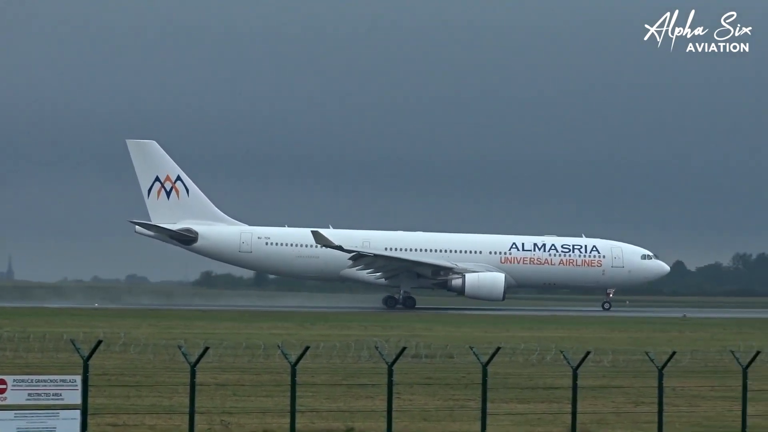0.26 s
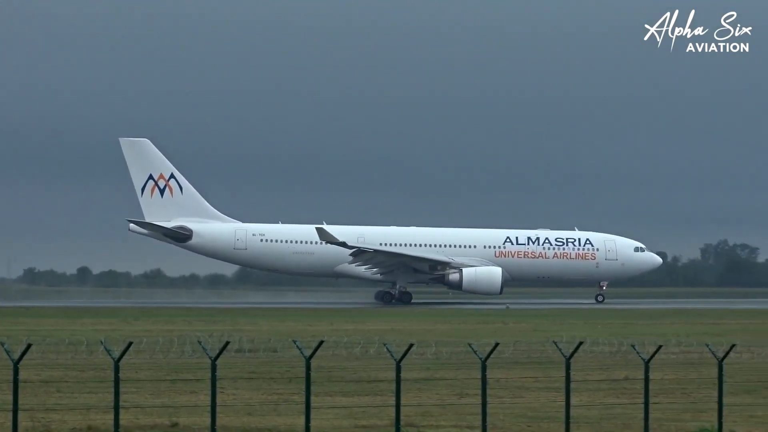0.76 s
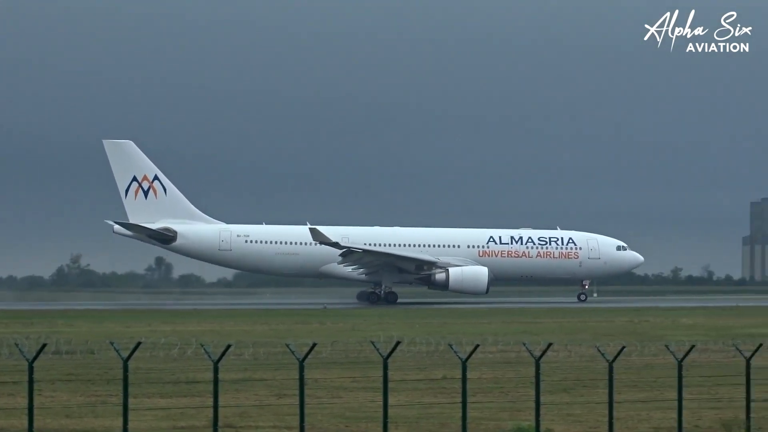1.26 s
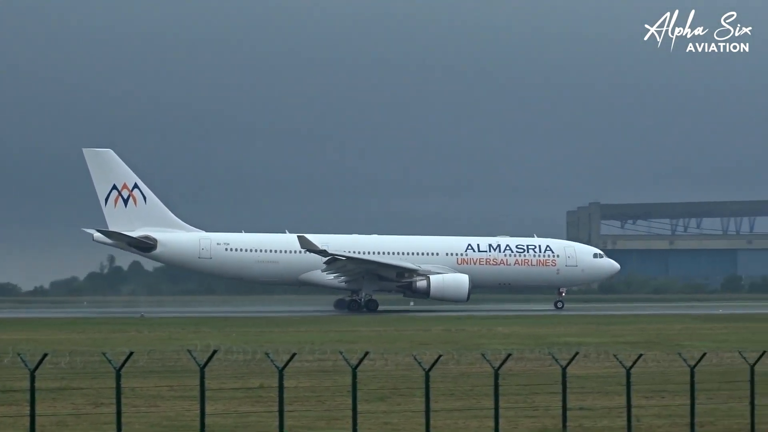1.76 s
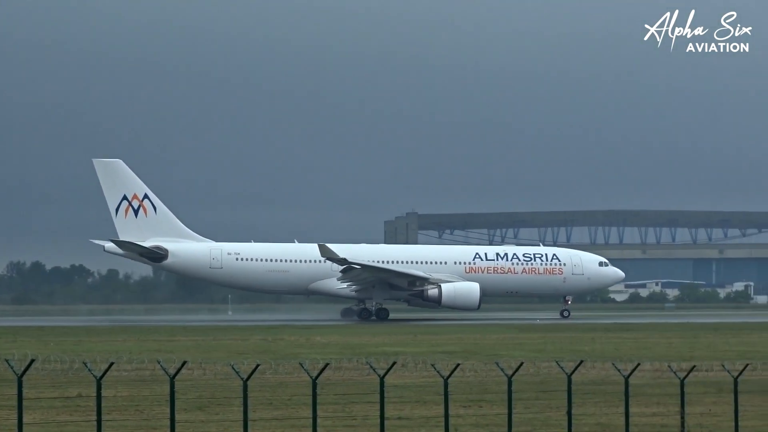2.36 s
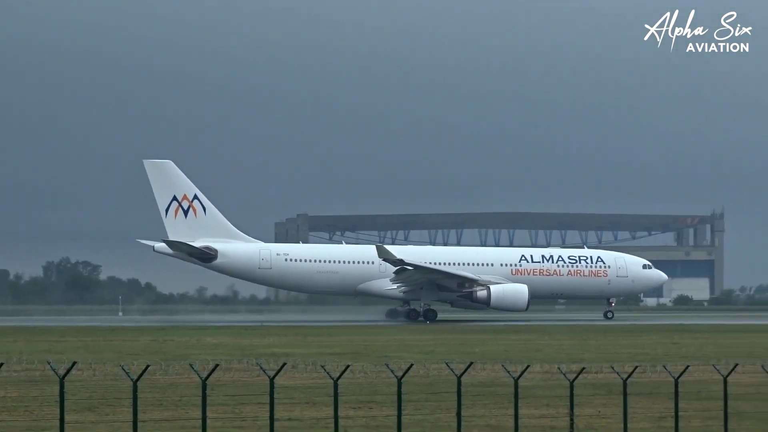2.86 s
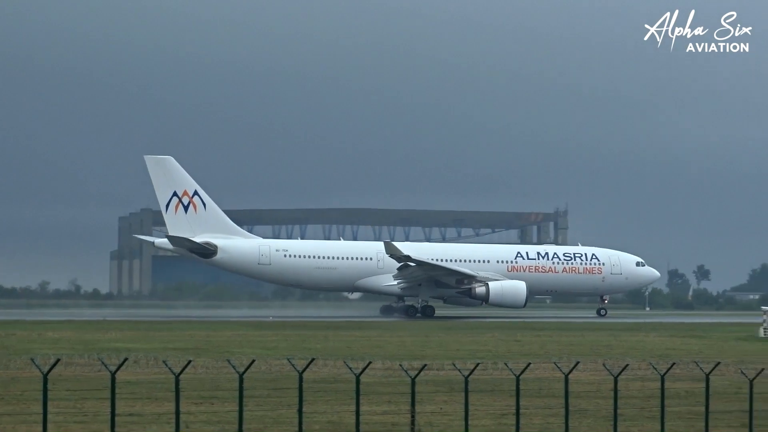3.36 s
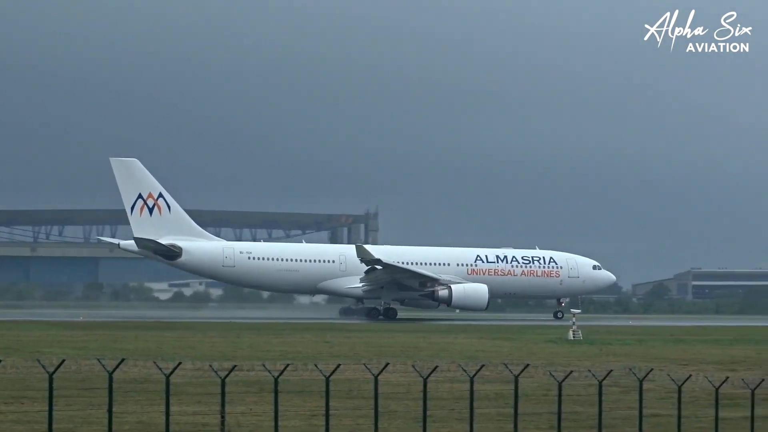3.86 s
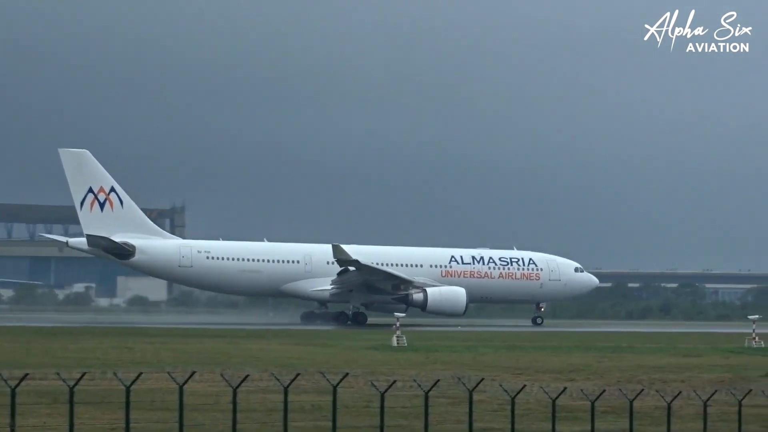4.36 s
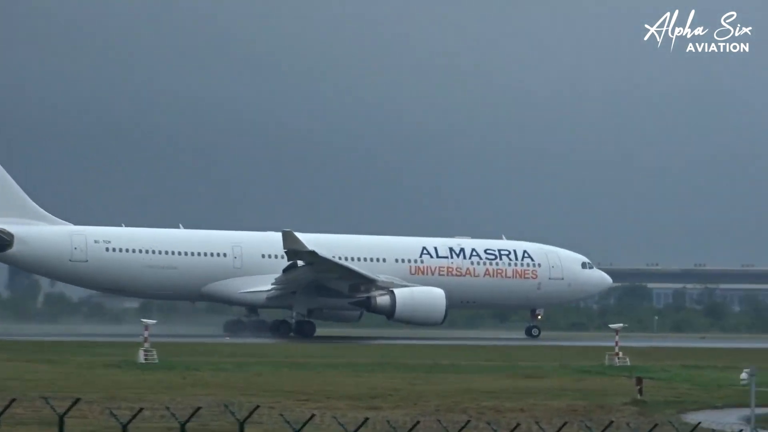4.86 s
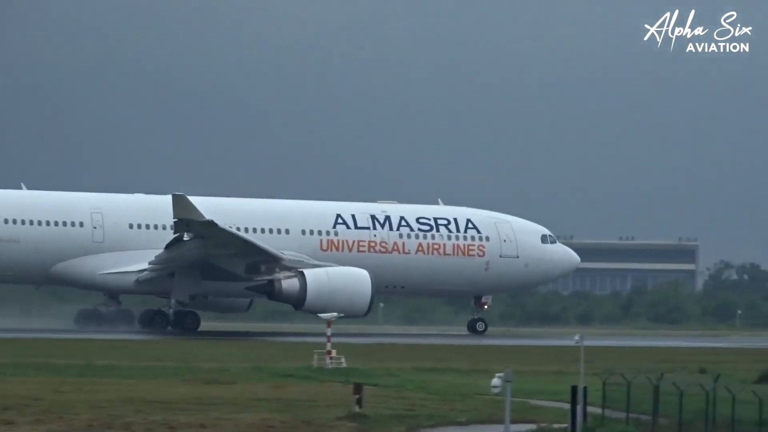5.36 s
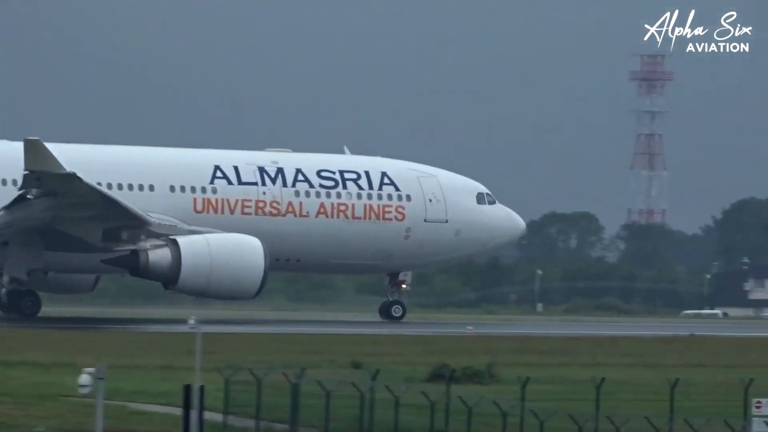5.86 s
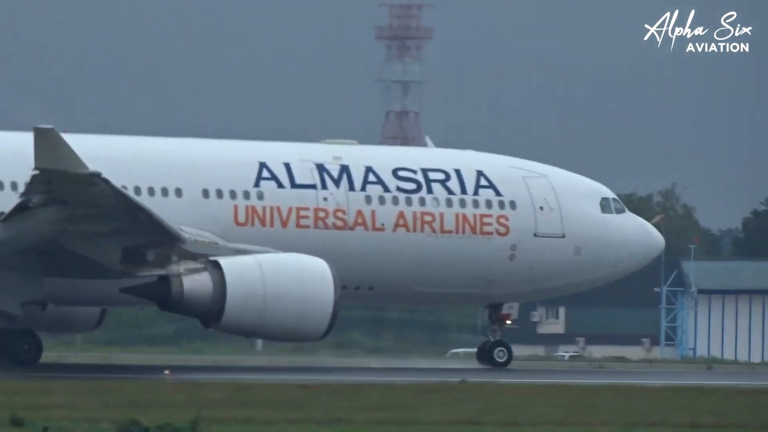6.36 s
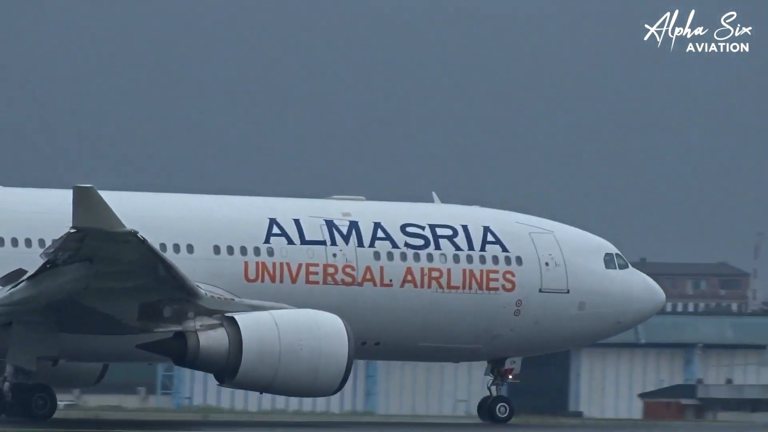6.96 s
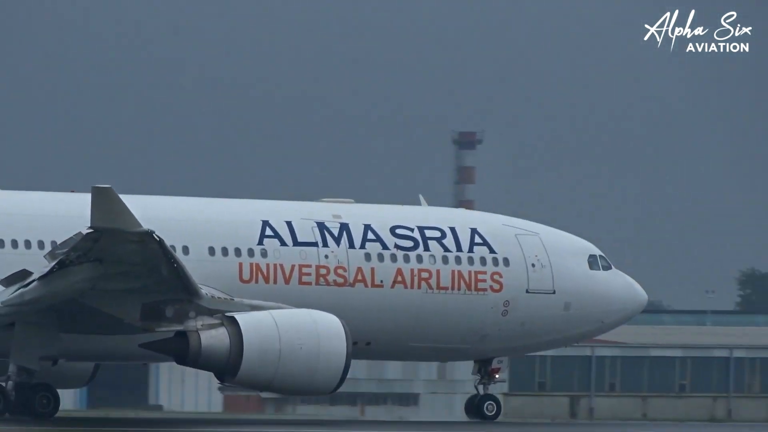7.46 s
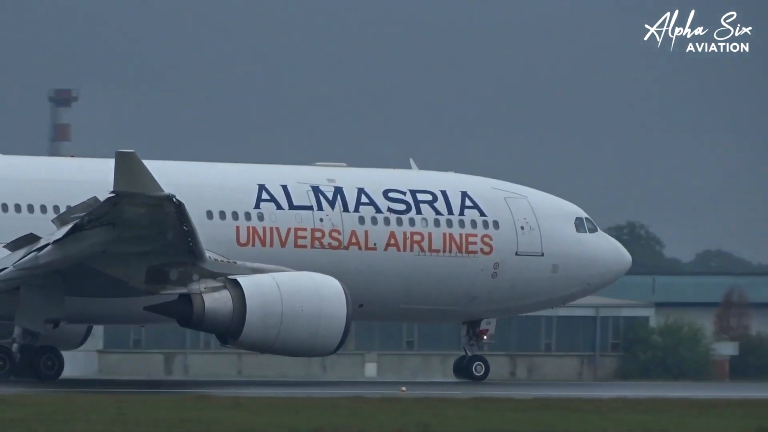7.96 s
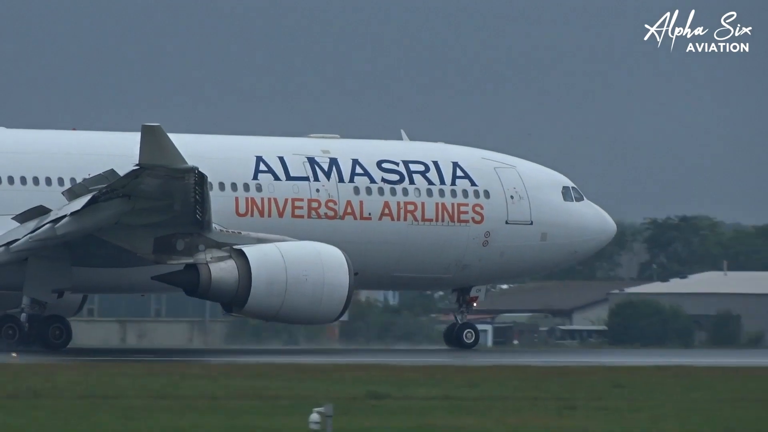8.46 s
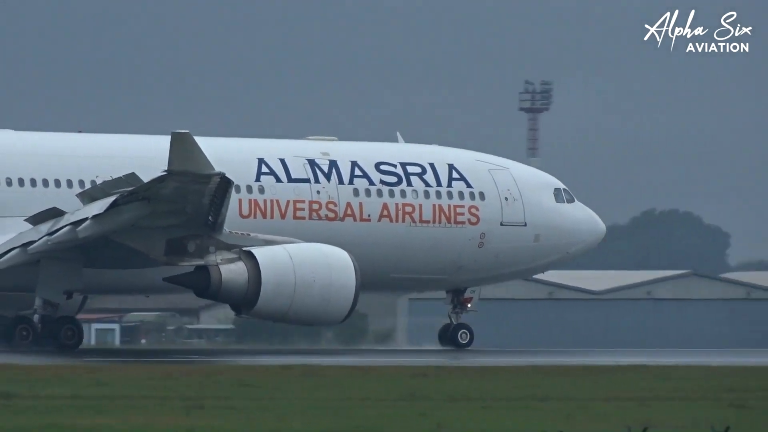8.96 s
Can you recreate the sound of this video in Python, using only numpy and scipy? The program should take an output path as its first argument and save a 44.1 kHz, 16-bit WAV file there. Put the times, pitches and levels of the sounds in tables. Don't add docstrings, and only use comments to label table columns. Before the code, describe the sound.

A twin-engine airliner slows along a wet runway, heard outdoors across a fence by a small stereo camera microphone. From 0 s a broad, hollow jet roar flutters and shifts in colour with the moving air. Two low howls near 365 Hz beat together; the nearer one is strong, peaks around 3 s and dies by 3.4 s, while the other returns in brief swells until about 6 s. Thin high whines flicker through, gliding down as the engines spool down. The roar dips near 4.3 and 7.3 s, swelling again toward the end at 9.2 s, drifting slightly left. Wind rumbles and buffets at the start, around 3.5 to 4.3 s and 6.6 to 8.5 s, with sharp snaps near 0.3, 4.2 and 7 s. A faint zoom-motor hiss runs from 4.2 to 6.4 s. Sparse raindrops tick on the housing, mostly after 6.3 s, over slight microphone hiss.

```python
import sys
import numpy as np
from scipy import signal
from scipy.fft import rfft, irfft, next_fast_len
from scipy.io import wavfile

SR = 44100
rng = np.random.default_rng(int(sys.argv[2]) if len(sys.argv) > 2 else 0)


def invert_db(level):
    return 10 ** (np.asarray(level, dtype=float) / 20)


def to_wav(sig):
    pcm = np.clip(np.atleast_2d(sig), -1, 1) * 32767
    pcm = np.round(pcm).astype(np.int16)
    wavfile.write(sys.argv[1], SR, pcm.T)


N = 406153


def rms_one(x):
    return x / np.sqrt(np.mean(x ** 2) + 1e-20)


def in_time(rows):
    s, *columns = np.transpose(rows)
    return [np.interp(np.arange(N) / SR, s, c) for c in columns]


def swells(rows, rise, fall, rest_db):
    t = np.arange(0, N + 64, 64) / SR
    power = 0
    for s, hold, db in rows:
        early, late = np.maximum(s - t, 0), np.maximum(t - s - hold, 0)
        power = power + invert_db(db - rise * early - fall * late) ** 2
    return 10 * np.log10(np.interp(np.arange(N) / SR, t, power) + invert_db(rest_db) ** 2)


def drift(rate):
    step = 16
    r = np.exp(-2 * np.pi * rate * step / SR)
    slow = signal.lfilter([1], [1, -2 * r, r * r], rng.standard_normal(N // step + 4002))[4000:]
    return np.interp(np.arange(N) / step, np.arange(len(slow)), rms_one(slow))


def at_hz(points, hz):
    f, db = np.transpose(points)
    return np.interp(np.log(hz), np.log(f), db)


def coloured(x, *spectra):
    size = next_fast_len(N)
    hz = np.maximum(np.arange(size // 2 + 1) * SR / size, 5)
    gain = invert_db(sum(at_hz(s, hz) for s in spectra))
    return irfft(rfft(x, size) * gain, size)[:N] * np.sqrt(SR / 2)


def filtered(x, hz, kind="low"):
    return signal.sosfilt(signal.butter(2, hz, kind, fs=SR, output="sos"), x)


def resonance(x, hz, width_hz):
    r = np.exp(-np.pi * width_hz / SR)
    top = np.array([1, 0, -1]) * (1 - r * r) / 2
    return signal.lfilter(top, [1, -2 * r * np.cos(2 * np.pi * hz / SR), r * r], x)


def stereo(mid, side):
    return np.array([mid + side, mid - side])


def panned(pan_db):
    return invert_db([pan_db / 2, -pan_db / 2])


# t/s, level/dB, brightness/dB
ROAR_LEVEL = [(0, -32, 1), (.6, -25, -1.5), (1.75, -28.5, -1), (1.97, -28.5, -2.5), (2.6, -28, -0.5),
              (3.05, -29, -1.5), (3.33, -26, 0), (4.27, -39, 4.5), (4.55, -29.5, 2), (4.9, -27, 1),
              (5.2, -30, -3.5), (5.8, -26.5, -2), (6.65, -27, -6), (7.3, -37.5, 3), (7.7, -30, 3.5),
              (8.25, -27, 1.5), (8.45, -33.5, -0.5), (9.0, -24.5, 1.5)]
ROAR_BANDS = [150, 700, 1700, 4500]
ROAR_FOLLOWS_LEVEL = [0.16, 0.81, 0.63, 0.23]
ROAR_FOLLOWS_BRIGHTNESS = [0.0, 0.0, .5, 1.0]
# f/Hz, level/dB per Hz
JET_COLOUR = [(25, -2), (80, -7), (300, 1.5), (500, 0), (900, -3), (1500, -3), (2300, -1.5), (2650, -6.5),
              (3400, -10), (4400, -1.5), (5500, -7), (7300, -14.5), (7900, -20), (9000, -27),
              (11000, -44.5)]
# f/Hz, side minus mid level/dB
JET_SPREAD = [(100, -24.5), (400, -44), (800, -20), (1700, -15.5), (3000, -10), (4000, -11.5),
              (4600, -28.5), (10000, -14)]
# start t/s, hold t/s, lift level/dB
CLEAR_MOMENTS = [
    (3.15, 0.11, 0.5),
    (4.85, 0.031, 2.5),
    (5.25, 0.14, 4),
    (5.72, 0.089, 4),
    (6.6, 0.054, 6.5),
    (7.75, 0.25, -19),
    (8.72, 0.045, 2),
]


def roar():
    loud_db, bright_db = in_time(ROAR_LEVEL)
    bright_db = bright_db + swells(CLEAR_MOMENTS, rise=25, fall=37, rest_db=0)
    mean_db = -30
    levels = (np.outer(ROAR_FOLLOWS_LEVEL, loud_db - mean_db)
              + np.outer(ROAR_FOLLOWS_BRIGHTNESS, bright_db)
              + [[-69.0], [-57.5], [-66.0], [-79.0]])
    noise = []
    for mid, side in rng.standard_normal((2, 2, N)):
        noise.append([coloured(mid, JET_COLOUR), coloured(side, JET_COLOUR, JET_SPREAD)])
    edges = 22 * 2 ** np.arange(0, 9.6, .5)
    out, shared = 0, drift(0.59)
    for k, (low, high) in enumerate(zip(edges, edges[1:])):
        place = np.interp(np.log(low * high) / 2, np.log(ROAR_BANDS), np.arange(4))
        level_db = np.maximum(1 - abs(place - np.arange(4)), 0) @ levels
        patchy_db = 0.7 * (drift(1.18) + 0.6 * shared)
        flutter_db = 1.22 * drift(15.6)
        band = filtered(noise[k % 2], [low, high], "band")
        out = out + band * invert_db(level_db + patchy_db + flutter_db)
    return band_swelled(np.array([echoed(x) for x in out]))


# t/s, hard echo delay/ms, its share [0-1], share of inverted ground echo [0-1]
NEAR_SURFACES = [(0, 1.97, 0.2, 0.07), (.6, 1.38, 0.25, 0.14), (1.6, 1.05, 0.21, 0.02),
                 (2.3, 0.94, 0, 0.09), (3.4, 1.34, 0.08, 0), (4.0, 1.3, 0, 0.23), (4.55, 0.83, 0.27, 0.36),
                 (5.1, 1.23, 0.28, 0.04), (5.6, 1.31, 0.35, 0.08), (6.0, 1.22, 0.2, 0.13),
                 (6.5, 1.38, 0.29, 0.01), (7.2, 1.37, 0.24, 0.07), (7.7, 1.4, 0.43, .01),
                 (8.4, 1.33, 0.27, .01), (8.8, 1.38, 0.29, 0), (9.21, 1.25, 0.4, .01)]


def echoed(x):
    cut_hz, rail_ms, rail_from_hz, rail_share, again = 1900, 1.335, 1800, 0.16, .9
    delay_ms, share, ground = in_time(NEAR_SURFACES)
    ground_ms = 1.49 + .035 * np.arange(N) / SR
    dull = filtered(x, cut_hz)
    lead = np.sqrt(2) / (2 * np.pi * cut_hz) * SR
    once, twice, thrice, below = [np.interp(np.arange(N) + lead - ms * SR / 1000, np.arange(N), dull)
                                  for ms in (delay_ms, 2 * delay_ms, 3 * delay_ms, ground_ms)]
    bounces = share * once + again * share ** 2 * (twice + share * thrice)
    rail_band = signal.butter(2, [rail_from_hz, 2 * rail_from_hz], "band", fs=SR, output="sos")
    rail = rail_share * np.roll(signal.sosfiltfilt(rail_band, x), round(rail_ms * SR / 1000))
    return (x + rail + bounces - ground * below) / np.sqrt(1 + share ** 2 + ground ** 2)


# t/s, length/s, f/Hz, lift level/dB
BAND_SWELLS = [(0.106, .2, 1500, 2.5), (.6, 0.22, 1620, 4.5), (.65, .2, 1050, 5.5), (1.15, 0.12, 900, 5.5),
               (1.2, 0.41, 620, 2.5), (1.302, 0.63, 6770, -1), (1.7, 0.45, 3330, 1.5),
               (1.657, 0.14, 980, 7.5), (2.402, .4, 3000, 1.5), (2.6, 0.41, 720, 6), (3.1, 0.39, 1450, -6),
               (3.402, .2, 750, 6), (3.7, 0.28, 520, -8), (4.0, 0.42, 1580, -14), (4.0, 0.46, 2200, 1.5),
               (4.75, 0.23, 856, 3.5), (4.752, 0.24, 2180, 5.5), (4.75, 0.27, 3000, 4.5),
               (5.585, 0.15, 1660, 7.5), (5.792, 0.65, 745, 5.5), (6.1, 0.53, 6500, 3.5),
               (6.35, 0.55, 635, 4), (6.506, 0.15, 2200, 2), (6.3, 0.55, 3000, 4), (7.4, .25, 2170, -1.5),
               (7.603, 1, 1100, -13), (7.7, 0.94, 6500, -1.5), (7.9, 0.26, 766, 0.5), (8.0, 0.61, 1530, 1),
               (8.6, 0.18, 750, 1.5), (8.6, 0.47, 1140, -4.5), (9.0, 0.5, 1570, 3.5), (9.0, .3, 380, -4),
               (.6, .4, 3350, 2), (1.0, .8, 3880, -5), (3.3, .5, 3300, 0.5), (4.92, .1, 260, -9),
               (5.3, 0.27, 2950, 1), (5.4, 0.34, 4700, 0.5), (6.35, 0.28, 570, 0.5), (6.45, .2, 70, -11),
               (7.3, .3, 1360, -4), (7.8, 0.39, 2950, 1), (8.5, .15, 560, -2.5), (8.5, 0.22, 1520, 2.5),
               (8.6, 0.44, 6000, -8), (1.5, .15, 1100, -2), (6.65, .15, 1040, 5.5), (1.2, 0.87, 8950, 7)]


def band_swelled(x):
    out = x.copy()
    for s, length, hz, db in BAND_SWELLS:
        start, end = int((s - 2 * length) * SR), int((s + 2 * length) * SR)
        at = np.arange(max(start, 0), min(end, N))
        swell = np.exp(-((at / SR - s) / length) ** 2)
        out[:, at] += (invert_db(db) - 1) * swell * resonance(x[:, at], hz, width_hz=0.093 * hz + 87)
    return out


def tone(hz, level_db, wobble_hz, shimmer_db, rate):
    phase = 2 * np.pi * np.cumsum(hz + wobble_hz * drift(rate)) / SR
    return np.sqrt(2) * invert_db(level_db + shimmer_db * drift(rate)) * np.sin(phase)


# t/s, level/dB
NEAR_HOWL = [(0, -23), (.1, -21), (.3, -26.5), (.55, -21), (.8, -23.5), (.95, -20.5), (1.25, -27),
             (1.55, -23), (1.75, -25.5), (1.87, -31.5), (1.98, -21), (2.15, -28.5), (2.32, -20),
             (2.65, -18), (2.78, -16), (3.0, -15.5), (3.2, -20), (3.32, -33)]
# start t/s, hold t/s, level/dB
FAR_HOWL = [(.4, .15, -41), (.8, 0.24, -32.5), (1.3, 0.14, -39), (1.57, 0.062, -28), (1.7, 0.086, -29),
            (1.95, 0.13, -28), (2.15, 0.15, -25), (2.35, 0.15, -27), (2.65, .1, -32), (2.88, .07, -32.5),
            (3.27, .04, -31), (3.4, 0.099, -24.5), (3.57, 0.023, -32), (3.73, .02, -29), (3.9, .08, -31.5),
            (4.02, .03, -34.5), (4.15, 0.21, -34), (4.42, .05, -38), (4.52, 0.066, -25),
            (4.62, 0.064, -26.5), (5.03, 0.077, -29), (5.2, 0.044, -41), (5.35, .02, -33),
            (5.48, 0.035, -32.5), (5.66, .03, -37.5), (5.8, .02, -45), (5.91, 0.018, -35.5)]
# t/s, f/Hz
FAR_HOWL_PITCH = [(0, 379), (2.2, 372.3), (3, 368.8), (3.45, 363.2), (4.2, 362.8), (4.6, 360.5),
                  (5.05, 360), (5.35, 354.5), (6.2, 350.5)]


def howls():
    t = np.arange(N) / SR
    fade = 150
    near_db = in_time(NEAR_HOWL)[0] - fade * np.maximum(t - NEAR_HOWL[-1][0], 0)
    far_db = swells(FAR_HOWL, rise=83, fall=fade, rest_db=-33 - 2.6 * t)
    near_hz = 364.6 - 2.9 * t
    far_hz, = in_time(FAR_HOWL_PITCH)
    near = tone(near_hz, near_db, wobble_hz=1.3, shimmer_db=1.4, rate=21)
    return near + tone(far_hz, far_db, wobble_hz=2.2, shimmer_db=2.2, rate=22)


def whine(hz, level_db, width_hz, steady):
    phase = 2 * np.pi * np.cumsum(hz) / SR
    scattered = drift(width_hz) * np.cos(phase) + drift(width_hz) * np.sin(phase)
    return invert_db(level_db) * (steady * np.sin(phase) + scattered) / np.sqrt(1 + steady ** 2 / 2)


# t/s, lower whine f/Hz
SPOOL_DOWN = [(0, 4455), (1.2, 4432), (2, 4395), (3, 4343), (4.9, 4197), (5.8, 4100), (7.2, 3985),
              (8.3, 3880), (9.21, 3800)]
# start t/s, hold t/s, level/dB
LOWER_WHINE = [(.18, 0.046, -51.5), (.4, 0.12, -59), (.9, 0.22, -56.5), (1.2, 0.22, -59.5),
               (1.6, 0.089, -57), (2, 0.33, -55.5), (2.5, .2, -58), (2.95, 0.23, -45.5), (3.3, .05, -52),
               (3.45, .04, -50), (3.6, .04, -55), (3.8, .1, -53), (4.35, .06, -49), (4.55, .04, -52),
               (4.75, 0.15, -53), (5.3, .2, -54), (5.8, .03, -53), (7.3, .1, -55), (7.6, .06, -54),
               (7.8, .2, -55), (8.15, .05, -61), (8.75, .1, -57)]
# start t/s, hold t/s, level/dB
UPPER_WHINE = [
    (4.4, .05, -56),
    (5, .05, -55),
    (5.72, .05, -56),
    (7.5, .45, -55),
    (8.7, .1, -52),
    (9.05, .15, -52),
]
# t/s, f/Hz, level/dB
HIGH_WHISTLE = [(7.1, 9020, -80), (7.6, 8750, -67), (8.4, 8620, -69), (8.7, 8500, -71), (9.21, 8400, -63)]


def whines():
    hz, = in_time(SPOOL_DOWN)
    lower_db = swells(LOWER_WHINE, rise=100, fall=92, rest_db=-73)
    upper_db = swells(UPPER_WHINE, rise=100, fall=92, rest_db=-63)
    steady = 2.0 - .15 * np.arange(N) / SR
    lower = whine(hz, lower_db, width_hz=45, steady=steady)
    upper = whine(1.135 * hz, upper_db, width_hz=85, steady=.2)
    return lower + upper + whine(*in_time(HIGH_WHISTLE), width_hz=220, steady=.05)


# t/s, left minus right level/dB
PASSING = [(0, 0.5), (3, 1.5), (5, 1), (9.21, 2.5)]


def engines():
    howl = howls()
    mid, side = roar()
    pan_db, = in_time(PASSING)
    steered = filtered(mid, [600, 3200], "band")
    side = side + np.tanh(pan_db * np.log(10) / 40) * steered
    return stereo(mid + howl + whines(), side + invert_db(-32.0) * howl)


# start t/s, hold t/s, level/dB
PORT_GUSTS = [(0, 0.21, -32), (.17, 0.19, -30.5), (.42, 0.062, -32), (.77, 0.051, -35), (.98, 0.065, -40),
              (1.5, 0.017, -39), (1.7, 0.025, -43.5), (1.88, 0.014, -33), (2.12, 0.12, -38),
              (2.35, 0.21, -40), (2.7, 0.02, -45), (3.5, 0.29, -30), (3.9, 0.36, -31), (4.55, 0.13, -36.5),
              (4.72, 0.073, -41.5), (5.1, 0.067, -31.5), (5.33, 0.034, -39), (6.02, .04, -51),
              (6.3, 0.021, -48), (6.63, 0.13, -36), (6.78, 0.22, -33), (7.05, 0.37, -30.5),
              (7.62, 0.088, -31), (7.85, 0.19, -34.5), (8.24, 0.043, -35), (8.32, 0.073, -30),
              (8.5, 0.051, -42.5), (8.68, 0.071, -34), (8.82, 0.12, -39), (9.1, 0.12, -34.5)]
# f/Hz, level/dB per Hz
WIND_SUM = [(25, -10.5), (70, -1.5), (200, -2), (350, -5.5), (600, -19.5), (1200, -30), (2500, -36),
            (4000, -46.5), (7000, -83)]
WIND_DIFFERENCE = [(25, -36), (80, -4.5), (170, 1.5), (370, 1), (600, -5.5), (1200, -17), (2500, -32),
                   (4000, -56.5), (7000, -89)]


def wind():
    gust_db = swells(PORT_GUSTS, rise=112, fall=105, rest_db=-55.5)
    lumps_db = 0.64 * drift(5.9)
    bursts = []
    for port in range(2):
        eddy_db = lumps_db + 8.5 * drift(87)
        bursts.append(invert_db(10.5 * np.tanh(eddy_db / 8.5)))
    left, right = rng.standard_normal((2, N)) * bursts
    pair = np.array([invert_db(1.0) * rms_one(coloured(left + right, WIND_SUM)),
                     invert_db(1.5) * rms_one(coloured(left - right, WIND_DIFFERENCE))])
    low = filtered(pair, 500)
    brighten = invert_db(0.44 * (gust_db + 40.5))
    mid, side = invert_db(gust_db) * (low + (pair - low) * brighten)
    return stereo(mid, side)


# t/s, peak level/dB, left minus right level/dB
WIND_SNAPS = [
    (.2825, -15, 0),
    (4.186, -18, 0),
    (6.916, -17, 4),
    (7.0035, -19, 0),
    (7.016, -19, 0),
    (7.1512, -13.5, -.5),
]


def snaps():
    out = np.zeros((2, N))
    u = (np.arange(256) / SR - .0025) / .00018
    push = u * np.exp(.5 - u * u / 2)
    for s, db, pan_db in WIND_SNAPS:
        at = round(s * SR)
        out[:, at:at + len(u)] += np.outer(panned(pan_db), invert_db(db) * push)
    return out


# t/s, level/dB
ZOOM_RUN = [
    (4.15, -82.5),
    (4.45, -69),
    (5.4, -69.5),
    (6.25, -68),
    (6.5, -93.5),
]
# f/Hz, width f/Hz, level/dB
HOUSING_RINGS = [(7000, 700, 4), (8500, 500, 1.5), (10700, 500, -4.5), (11400, 700, -0.5),
                 (14300, 1100, -1), (15300, 800, -1.5)]


def zoom_motor():
    level_db, = in_time(ZOOM_RUN)
    white = rng.standard_normal(N)
    rings = 0
    for hz, width_hz, db in HOUSING_RINGS:
        ring = resonance(resonance(white, hz, width_hz), hz, width_hz)
        rings = rings + invert_db(db + 1.5 * drift(6)) * rms_one(ring)
    return invert_db(level_db - 2.0) * rings


# t/s, peak level/dB, ring f/Hz, left minus right level/dB, knock level/dB
RAIN = [(.5666, -26.5, 10800, -4.5, -10), (3.994, -27, 7500, -3.5, 19), (4.0416, -20.5, 9000, -8, 1),
        (6.377, -31.5, 11600, 2.5, -2), (6.384, -32, 14900, 15, 3.5), (6.6797, -33.5, 9250, -3.5, -5),
        (6.818, -40.5, 10900, 6, -2), (6.858, -30.5, 12600, 10, 1), (7.8, -34.5, 10200, 6.5, 5),
        (8.109, -38, 9400, -3, -17), (8.36, -43, 11100, 6, -9), (8.509, -40.5, 11400, 12, -3),
        (8.6813, -35, 11600, 1, -2)]


def raindrops():
    out, t = np.zeros((2, N + 1000)), np.arange(1000) / SR
    for s, db, hz, pan_db, knock_db in RAIN:
        grit = rng.standard_normal(1000)
        burst = (.5 * grit + 3.2 * (t == 0)) * invert_db(-60 * t / .007)
        crack = .6 * filtered(burst, 7000, "high")
        ring = 1.5 * resonance(burst, min(hz, 16000), 2000)
        knock = invert_db(knock_db + 14) * resonance(burst, 3180, 250)
        tick = crack + ring + knock
        at = round(s * SR)
        out[:, at:at + 1000] += np.outer(panned(pan_db), tick / abs(tick).max()) * invert_db(db - 2.5)
    return out[:, :N]


def scene():
    return engines() + wind() + snaps() + zoom_motor() + raindrops()


def self_noise():
    mid, side = rng.standard_normal((2, N))
    lifted = invert_db(1.5 * drift(.5)) * resonance(side, 9700, 2500)
    return invert_db(-62 + .8 * drift(6)) * stereo(mid, .08 * side + lifted)


def band_limit(x):
    return signal.sosfilt(signal.butter(12, 15780, fs=SR, output="sos"), x)


def record(dry):
    mix = dry + self_noise()
    return band_limit(mix)


dry = scene()
out = record(dry)
to_wav(out)
```